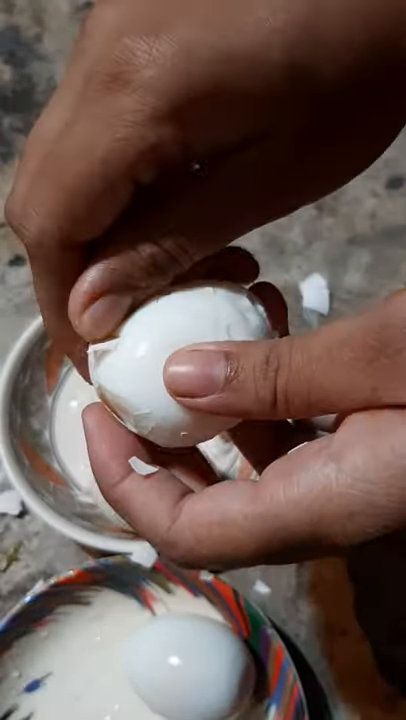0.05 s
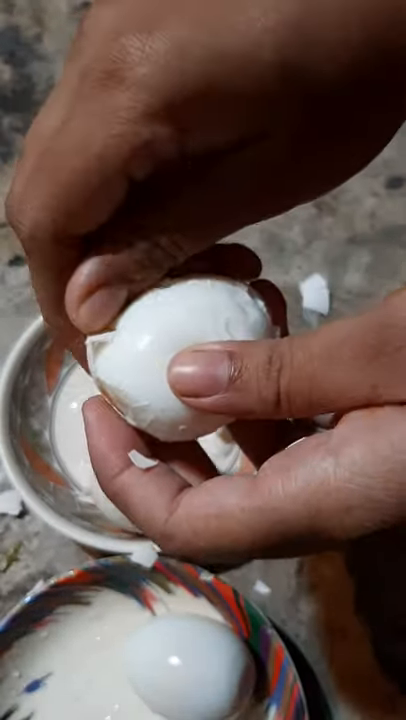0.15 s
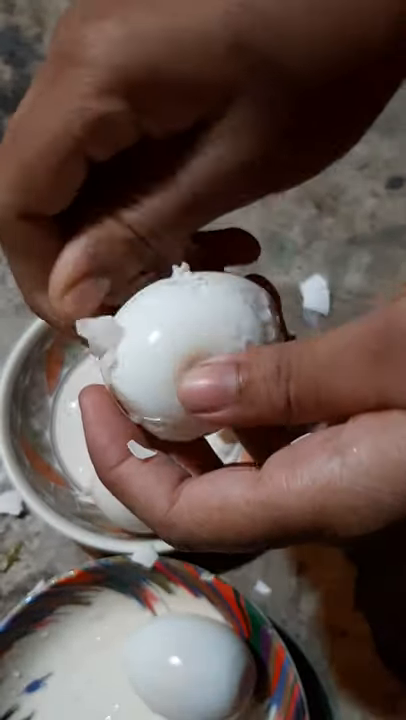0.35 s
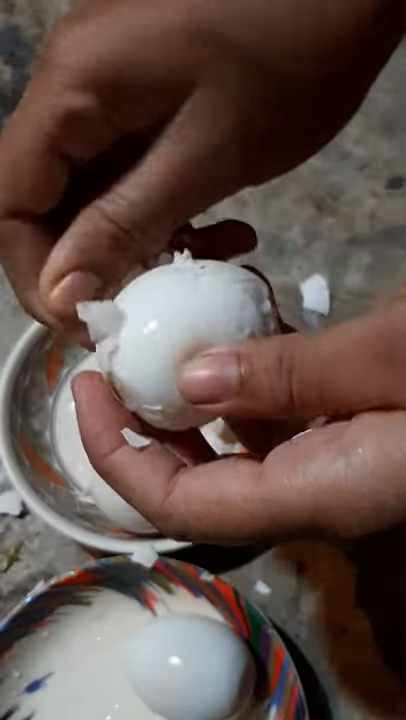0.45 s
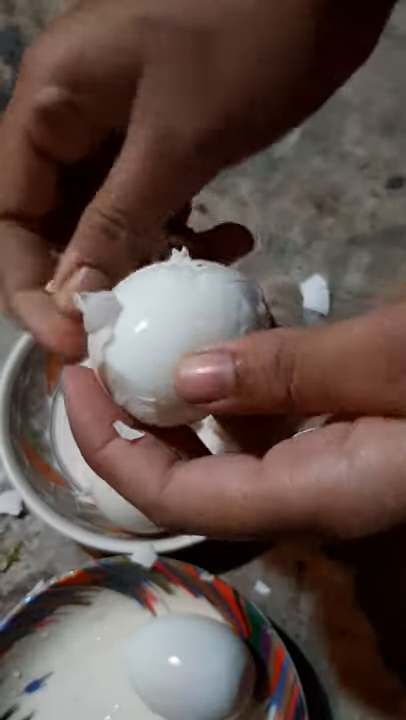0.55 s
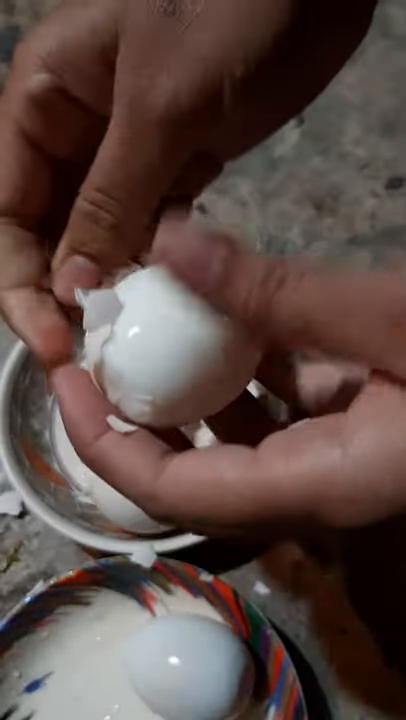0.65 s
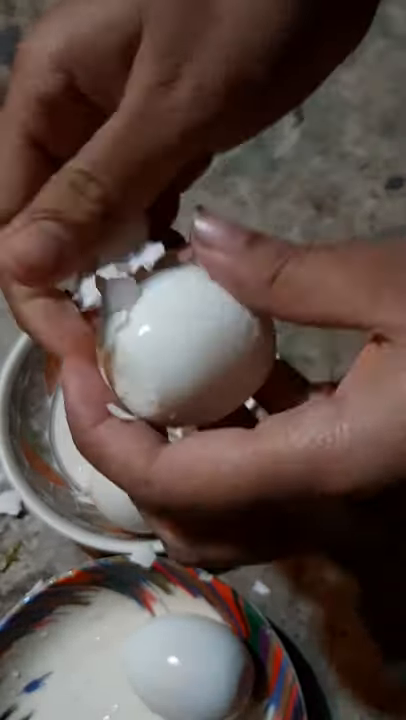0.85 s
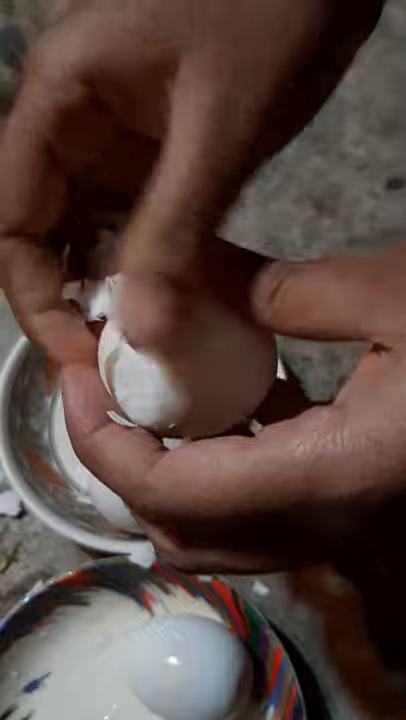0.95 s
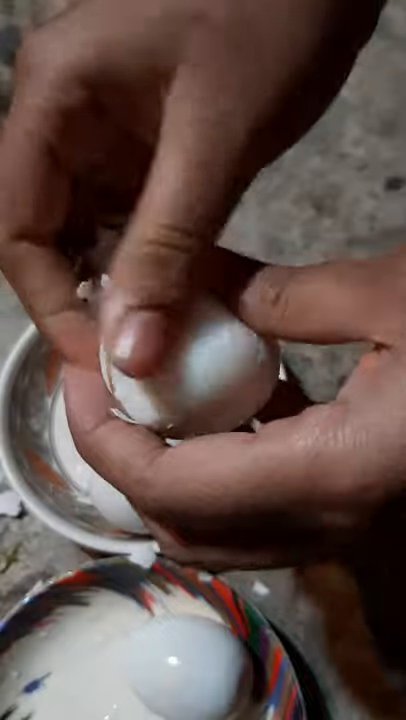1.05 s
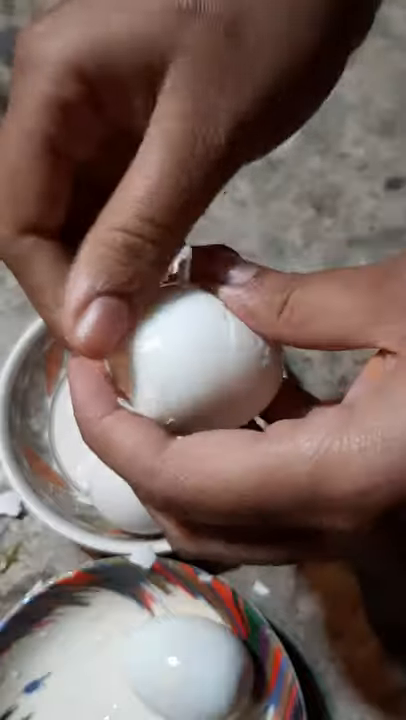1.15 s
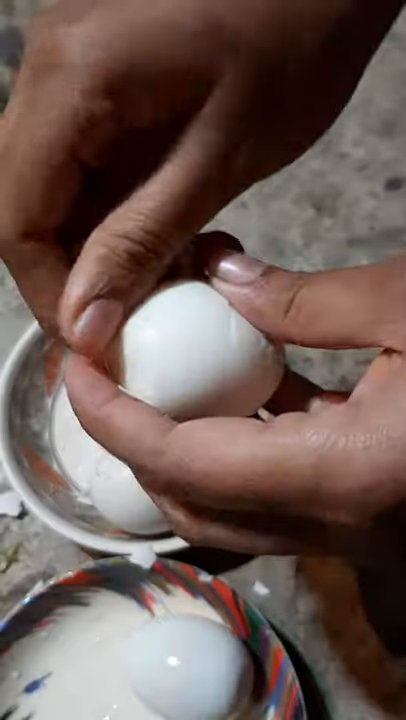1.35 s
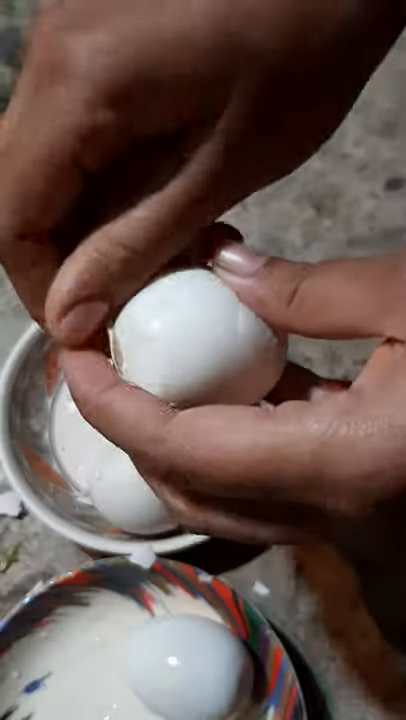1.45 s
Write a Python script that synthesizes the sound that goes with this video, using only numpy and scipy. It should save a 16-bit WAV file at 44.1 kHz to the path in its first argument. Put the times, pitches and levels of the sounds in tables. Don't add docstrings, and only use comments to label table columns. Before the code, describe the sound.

Fingers crack and pull eggshell away in dry, bright snaps and crumbly ticks in a quiet kitchen

```python
import sys
import numpy as np
from scipy import signal
from scipy.fft import rfft, irfft
from scipy.io import wavfile

SR = 44100
rng = np.random.default_rng(int(sys.argv[2]) if len(sys.argv) > 2 else 0)


def file_out(sig):
    cols = np.atleast_2d(sig).T
    lim = np.clip(cols, -1, 1)
    pcm = np.round(lim * 32767).astype(np.int16)
    wavfile.write(sys.argv[1], SR, pcm)


def boost_factor(decibels):
    exponent = np.asarray(decibels, float) / 20
    return 10 ** exponent


N = 66150

# frequency in Hz, level in dB.
RUMBLE_SPECTRUM = [(30, -57), (45, -11), (68, -4.5), (102, -7.5), (248, -20), (300, -10), (340, -28.5),
                   (538, -21), (1100, -34)]
# time in seconds, level in dB.
RUMBLE_SWELLS = [(0.0, -75), (0.2, -74), (.3, -67), (.45, -74), (.68, -74.5), (.74, -78.5), (.82, -72),
                 (1, -75.5), (1.15, -74), (1.3, -74), (1.5, -73)]
# frequency in Hz, level in dB.
HISS_SPECTRUM = [(650, -45), (1100, -13), (2540, -18.5), (3530, -15), (4000, 0), (7640, -11.5), (9360, -24),
                 (14700, -7), (16500, -21.5)]
# frequency in Hz, correlation from 0 to 1.
LEFT_RIGHT_LIKENESS = [(60, 0.87), (240, 0.5), (950, 0.29), (3770, 0.013), (15000, 0.041)]
RUMBLE_PAN_DB, HISS_DB, FLOOR_PAN_DB = -3, -75.5, -10.5

# time in seconds, level in dB.
TRICKLE_LEVEL = [(0.0, -72), (.45, -73), (0.72, -91.5), (.9, -76.5), (1.5, -69.5)]
# frequency in Hz, width in Hz, level in dB.
TRICKLE_RESONANCES = [(1500, 97, 4), (1372, 280, 5), (4700, 2000, 7.5)]

# start in seconds, peak in dB, flake pitch in Hz,
# hollow body share in dB, top edge share in dB.
FIRST_PEEL = [(0.0074, -50.5, 7500, -29, -12), (0.0199, -44, 7370, -27.5, -11.5),
              (0.0667, -30.5, 7050, -17, -18), (0.1514, -52, 5330, -2, -14),
              (0.1978, -32.5, 5700, -23, -14), (0.3512, -47, 7400, -12, -2.5),
              (0.3778, -21.5, 7870, -27.5, -20), (0.3835, -35.5, 7600, -28, -9.5),
              (0.3782, -30.5, 5080, -22.5, -6), (0.3974, -43, 14400, -33, -3.5),
              (0.4694, -50, 5760, -54, -10), (0.5024, -63, 6150, -34, 0), (0.5838, -47, 7700, -22.5, -16),
              (0.5972, -43.5, 7750, -41, -23), (0.6024, -42, 7800, -67, -14),
              (0.6174, -45.5, 7700, -24, -30), (0.7253, -55, 7650, -29, -12),
              (0.7488, -59.5, 14300, -25, -11), (0.7587, -52.5, 7500, -21.5, -10),
              (0.7936, -48, 7300, -34, -17)]
# start in seconds, peak in dB, flake pitch in Hz, body and top shares in dB.
BIG_TEAR = [(.2340, -43, 6500, -14, -6), (.2360, -37, 5800, -17, -1), (.2396, -38, 6850, -35, -16),
            (.2410, -7, 6230, -34, -18.5), (.2440, -11, 6120, -43, -10), (.2459, -11, 6480, -40, -12),
            (.2471, -14, 7800, -59, -39), (.2484, -19, 8350, -44, -6), (.2497, -22, 7240, -22, -3.5),
            (.2510, -18, 6800, -31, -13.5), (.2807, -19.5, 6800, -46, -14)]
# start in seconds, peak in dB, flake pitch in Hz, body and top shares in dB.
SECOND_PEEL = [(0.8997, -40.5, 7170, -30.5, -0.5), (0.9841, -58.5, 7850, -21, 2),
               (1.05, -62, 12000, -33, -7), (1.074, -56.5, 5120, -11.5, -28), (1.125, -52.5, 6140, -47, 2),
               (1.151, -47, 8340, -21, -28), (1.1671, -42.5, 7000, -18.5, -8),
               (1.2342, -29, 7400, -18.5, -12.5), (1.2374, -25, 5340, -47, -19),
               (1.4150, -44.5, 9300, -31, -30), (1.421, -46, 6400, -13, -19),
               (1.4478, -30.5, 5720, -21, -43), (1.4594, -48.5, 7840, -13.5, -6),
               (1.488, -46.5, 5170, -12, -7)]
# start in seconds, peak in dB, flake pitch in Hz, # body and top
# shares in dB.
FURTHER_SNAPS = [(.2006, -35.5, 5680, -42, -23), (.3698, -44, 6340, -46, -3), (.9102, -44.5, 8000, -27, -17),
                 (1.2252, -33.5, 6940, -40, -29), (1.2312, -42, 6860, -36, -26),
                 (1.2415, -40, 5000, -8.5, -15), (1.2390, -23, 10210, -27.5, -12),
                 (1.2402, -28.5, 7700, -48, -9), (1.4262, -40.5, 7300, -47, -26),
                 (1.4490, -42, 12000, -14, 4.5), (1.4288, -52, 7360, -35, -11), (1.4400, -51, 6250, -7, -3)]
# start in seconds, peak in dB, flake pitch in Hz, top share in dB.
TICKS_BETWEEN = [(.0050, -47, 5600, -15), (0.016, -63, 14100, -20), (0.261, -38, 6900, -22),
                 (.2640, -27, 7400, -35), (0.278, -31, 6500, -31), (0.28, -40, 6900, -10),
                 (.2844, -37, 6500, -18), (.2897, -36, 6400, -48), (0.2931, -27, 6700, -18),
                 (0.2962, -23, 6300, -18), (0.2992, -25, 7450, -32), (0.3258, -32, 5740, -28),
                 (0.3429, -29, 5600, -25), (0.581, -53, 12000, -20.5), (0.592, -49, 7800, -16),
                 (.6048, -51, 8000, 1), (0.612, -40, 6980, -12), (0.613, -47.5, 7700, -15),
                 (0.6301, -47, 7750, -7), (0.6424, -51.5, 7400, -10), (0.671, -54, 7600, -8),
                 (.7735, -61.5, 13800, -18), (.8028, -60, 8300, -7), (0.814, -56, 7300, -17),
                 (.9020, -36, 14960, -8), (0.904, -48, 7660, -6), (.9126, -47, 15040, 0),
                 (1.128, -49, 11360, -20), (1.1692, -46, 8900, -5), (1.1712, -52.5, 7700, 0),
                 (1.2382, -44, 12700, -14), (1.2403, -36, 6970, -17), (1.449, -43, 12000, 10),
                 (1.4521, -47, 12900, -3)]
# time in seconds, left minus right in dB.
HAND_PLACE = [(0, -7), (.2, -5.5), (.24, -4.5), (.4, -4.5), (.9, -8), (1.09, -8), (1.12, 0), (1.165, -4),
              (1.23, 0), (1.4, 0), (1.46, -4)]
FLAKE_WIDTH_HZ, TEAR_WIDTH_HZ = 3140, 2200
TOP_HZ, TOP_WIDTH_HZ, TOP_DB, TOP_PAN_DB = 12000, 11200, 11, 3.5
BODY_HZ, BODY_WIDTH_HZ, BODY_DB = 2444, 1100, 3
SNAP_DB, PEEL_DELAY_S = -1, 0.0006
SCATTER_DB, TEAR_SCATTER_DB, TICK_SCATTER_DB = -10.5, -21, -20
SCATTER_T60_S, SCATTER_ALIKE = 0.015, 0.18
TICK_BODY_DB = -34.5
HOLLOW_LAG_SAMPLES, HOLLOW_PAN_DB = 6, -2.5

# time in seconds, crumbling level in dB.
CRUMBLING_EFFORT = [(0, -95), (.04, -79), (.2, -81), (.26, -48), (.4, -60.5), (.55, -117), (.605, -63.5),
                    (.66, -85.5), (1.2, -68.5), (1.24, -60.5), (1.3, -64.5), (1.405, -80), (1.435, -57),
                    (1.5, -82)]
CRUMBS_PER_S, CRUMB_SPREAD_DB = 1500, 2.5
CRUMB_LOW_HZ, CRUMB_HIGH_HZ, CRUMB_CYCLES = 3600, 15600, 1.5

# frequency in Hz, time to fall 60 dB in seconds.
ROOM_DECAY = [(1000, 0.14), (2500, 0.45), (4500, 0.55), (6000, 0.58), (7700, 0.43), (10000, 0.49),
              (15000, 0.33)]
# frequency in Hz, level in dB.
ROOM_COLOUR = [(900, 2), (1500, 9), (3000, 1.5), (4600, 1), (6000, -9), (7700, -2.5), (9300, -10),
               (15000, -3)]
ROOM_DB, ROOM_DELAY_S, ROOM_PAN_DB = -40.5, 0.0009, -5

# start in seconds, peak in dB, pitch in Hz,
# time to fall 60 dB in seconds.
HOLLOW_KNOCKS = [(0.0676, -40.5, 2077, 0.02), (.0672, -37, 2463, 0.02), (.2415, -42, 2045, 0.066),
                 (.2438, -38, 2550, 0.02), (.2445, -51, 845, 0.021), (.2480, -37, 2575, 0.025),
                 (1.0745, -57, 2060, 0.047), (1.0760, -58.5, 3220, 0.083), (1.238, -48.5, 2050, 0.027),
                 (1.239, -42, 2595, 0.014), (1.4488, -43, 1450, 0.014), (1.4485, -41.5, 1940, 0.0094),
                 (1.4485, -40.5, 2470, 0.012), (1.447, -50, 3180, 0.037)]
KNOCK_SEND_DB = -11

# start in seconds, length in seconds, level in dB,
# start pitch in Hz, end pitch in Hz.
FINGER_RUBS = [
    (0.554, 0.14, -75, 2680, 2560),
    (1.248, 0.064, -64, 3150, 3300),
    (1.293, 0.11, -65.5, 3180, 3450),
    (1.444, 0.056, -60.5, 1500, 1500),
]
RUB_WIDTH_HZ, RUB_SLIPS_HZ, RUB_SLIP_DB = 174, 60, 2.5

# frequency in Hz, width in Hz, share added.
PORT_COLOUR = [(7700, 300, 0.25), (8570, 1350, -0.4), (3465, 740, -0.27)]
RIGHT_LAG_S = 0.000246
CUTOFF_HZ, DIFFUSE_CUTOFF_HZ = 17000, 16350


def in_time(rows):
    return np.interp(np.arange(N) / SR, *np.transpose(rows))


def at_hz(points, hz):
    table_hz, values = np.array(points).T
    return np.interp(np.log(hz), np.log(table_hz), values)


def pan(db):
    return boost_factor(np.array([db / 2, -db / 2]))


def pan_fixed(db):
    return pan(db)[:, None]


def low_pass(x, hz):
    return signal.sosfilt(signal.cheby2(14, 60, hz, fs=SR, output="sos"), x)


def resonance(x, hz, width_hz):
    r = np.exp(-np.pi * width_hz / SR)
    feedback = [1, -2 * r * np.cos(2 * np.pi * hz / SR), r * r]
    return signal.lfilter([(1 - r * r) / 2, 0, (r * r - 1) / 2], feedback, x)


def steep_resonance(x, hz, width_hz):
    y = resonance(resonance(x, hz, width_hz), hz, width_hz)
    return y / abs(y).max()


def third_octaves(low_hz, high_hz):
    edges = low_hz * 2 ** np.arange(0, np.log2(high_hz / low_hz) + .3, 1 / 3)
    settle = 8192
    white = rng.standard_normal((2, 2, N + settle))
    bands = []
    for k, (a, b) in enumerate(zip(edges, edges[1:])):
        band_pass = signal.butter(2, [a, b], "band", fs=SR, output="sos")
        bands.append((np.sqrt(a * b), signal.sosfilt(band_pass, white[k % 2])[:, settle:]))
    return bands


def background(spectrum, level_db, pan_db, low_hz, high_hz):
    out = 0
    for hz, (mid, side) in third_octaves(low_hz, high_hz):
        alike = np.clip(at_hz(LEFT_RIGHT_LIKENESS, hz), -1, 1)
        stereo = np.sqrt(1 + alike) * mid + np.sqrt(1 - alike) * side * [[1], [-1]]
        out = out + boost_factor(at_hz(spectrum, hz)) * stereo
    return boost_factor(level_db) * out / out.std() * pan_fixed(pan_db)


def trickle():
    white = rng.standard_normal((2, N))
    out = 0
    for hz, width_hz, db in TRICKLE_RESONANCES:
        ringing = resonance(resonance(white, hz, width_hz), hz, width_hz)
        out = out + boost_factor(db) * ringing / np.sqrt(width_hz)
    return boost_factor(in_time(TRICKLE_LEVEL)) * out / out.std() * pan_fixed(FLOOR_PAN_DB)


def hollow_side(x):
    return np.array([np.roll(x[0], HOLLOW_LAG_SAMPLES), x[1]]) * pan_fixed(HOLLOW_PAN_DB)


def snaps(table, scatter_db, width_hz, delay_s=0):
    out, t = np.zeros((2, N + SR)), np.arange(2048) / SR
    hand = in_time(HAND_PLACE)
    noise = rng.standard_normal((len(table), 3, len(t)))
    shared, separate = noise[:, :1], noise[:, 1:]
    scatter = np.sqrt(SCATTER_ALIKE) * shared + np.sqrt(1 - SCATTER_ALIKE) * separate
    scatter = scatter * boost_factor(scatter_db - 60 * t / SCATTER_T60_S)
    clicks = scatter + (t == 0)
    for (s, db, hz, body_db, top_db), click in zip(table, clicks):
        flake = steep_resonance(resonance(click, hz, width_hz), hz, width_hz)
        top = boost_factor(top_db + TOP_DB) * steep_resonance(click, TOP_HZ, TOP_WIDTH_HZ) * pan_fixed(TOP_PAN_DB)
        body = steep_resonance(resonance(click, BODY_HZ, BODY_WIDTH_HZ), BODY_HZ, BODY_WIDTH_HZ)
        parts = flake + top + boost_factor(body_db + BODY_DB) * hollow_side(body)
        i = int((s + delay_s) * SR)
        out[:, i:i + len(t)] += boost_factor(db + SNAP_DB) * parts * pan_fixed(hand[i])
    return out[:, :N]


def ticks():
    rows = [(s, db, hz, TICK_BODY_DB, top_db) for s, db, hz, top_db in TICKS_BETWEEN]
    return snaps(rows, TICK_SCATTER_DB, FLAKE_WIDTH_HZ)


def crumbs():
    sizes = boost_factor(CRUMB_SPREAD_DB * np.minimum(rng.exponential(1, N), 3)) * rng.choice([-1, 1], N)
    clicks = sizes * (rng.random(N) < CRUMBS_PER_S / SR) + 1e-18
    dealt = rng.integers(0, 12, N)
    out = 0
    for k, hz in enumerate(np.geomspace(CRUMB_LOW_HZ, CRUMB_HIGH_HZ, num=12)):
        out = out + resonance(clicks * (dealt == k), hz, hz * 2 / CRUMB_CYCLES)
    return boost_factor(in_time(CRUMBLING_EFFORT)) * out / out.std() * pan(in_time(HAND_PLACE))


def kitchen(x):
    t = np.arange(N) / SR
    tail = 0
    for hz, noise in third_octaves(722, 17000):
        tail = tail + boost_factor(at_hz(ROOM_COLOUR, hz) - 60 * t / at_hz(ROOM_DECAY, hz)) * noise
    tail = boost_factor(ROOM_DB) * tail * np.clip(t / ROOM_DELAY_S, 0, 1) ** 2
    return signal.fftconvolve(tail, x[None], axes=1)[:, :N] * pan_fixed(ROOM_PAN_DB)


def knocks():
    out, t = np.zeros(N + SR), np.arange(4096) / SR
    for s, db, hz, t60 in HOLLOW_KNOCKS:
        tone = np.sin(2 * np.pi * hz * t) * (1 - np.exp(-t * hz))
        out[int(s * SR):][:len(t)] += boost_factor(db - 60 * t / t60) * tone
    return hollow_side(out[:N] * pan(in_time(HAND_PLACE)))


def wobble(hz):
    white = rng.standard_normal((2, N)) + 1j * rng.standard_normal((2, N))
    slow = signal.lfilter(*signal.butter(2, hz, fs=SR), white)
    return slow / slow.real.std()


def rubs():
    out, t = 0, np.arange(N) / SR
    grain = wobble(RUB_WIDTH_HZ)
    slips = boost_factor(RUB_SLIP_DB * wobble(RUB_SLIPS_HZ)[0].real)
    for s, length, db, start_hz, end_hz in FINGER_RUBS:
        along = np.clip((t - s) / length, 0, 1)
        phase = 2 * np.pi * np.cumsum(start_hz + (end_hz - start_hz) * along) / SR
        glide = (grain * np.exp(1j * phase)).real
        out = out + boost_factor(db) * glide * np.sin(np.pi * along) * slips
    return out * pan_fixed(ROOM_PAN_DB)


def later_at_right(x):
    turn = np.exp(-2j * np.pi * np.fft.rfftfreq(N, 1 / SR) * RIGHT_LAG_S)
    return np.array([x[0], irfft(rfft(x[1]) * turn, N)])


def scene():
    shell = 0
    for peel in (FIRST_PEEL, SECOND_PEEL):
        shell = shell + snaps(peel, SCATTER_DB, FLAKE_WIDTH_HZ, PEEL_DELAY_S)
    shell = shell + snaps(BIG_TEAR, TEAR_SCATTER_DB, TEAR_WIDTH_HZ)
    shell = shell + snaps(FURTHER_SNAPS, SCATTER_DB, FLAKE_WIDTH_HZ)
    shell = shell + ticks()
    shell = shell + low_pass(crumbs(), DIFFUSE_CUTOFF_HZ)
    hollow = knocks()
    floor = background(RUMBLE_SPECTRUM, in_time(RUMBLE_SWELLS), RUMBLE_PAN_DB, 36.14, 1100)
    floor = floor + background(HISS_SPECTRUM, HISS_DB, FLOOR_PAN_DB, 1059, 16500) + trickle()
    room = kitchen((shell + boost_factor(KNOCK_SEND_DB) * hollow).sum(axis=0))
    return later_at_right(shell + hollow) + low_pass(room + floor + rubs(), DIFFUSE_CUTOFF_HZ)


def top_cut(x):
    return signal.sosfilt(signal.butter(12, 16980, fs=SR, output="sos"), x)


def record(dry):
    for hz, width_hz, share in PORT_COLOUR:
        dry = dry + share * resonance(dry, hz, width_hz)
    return top_cut(low_pass(dry, CUTOFF_HZ))


dry = scene()
out = record(dry)
file_out(out)
```